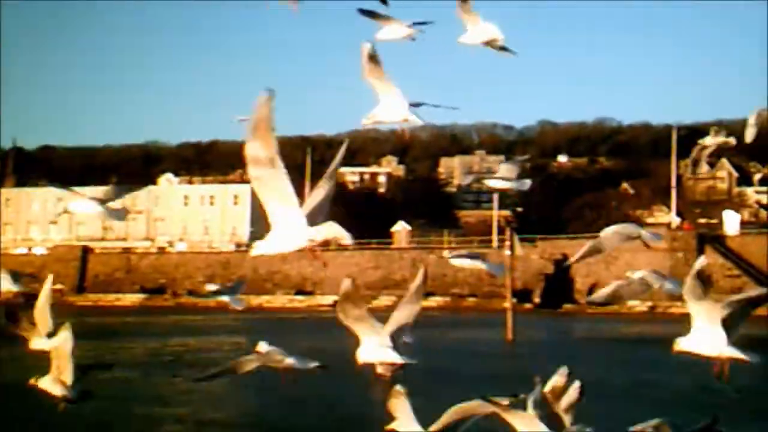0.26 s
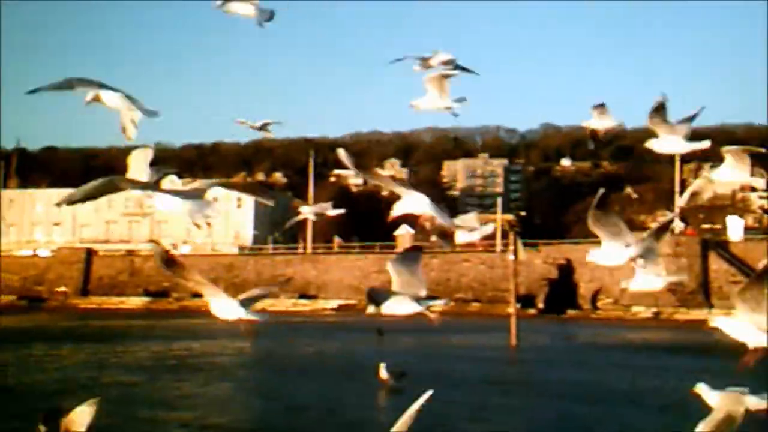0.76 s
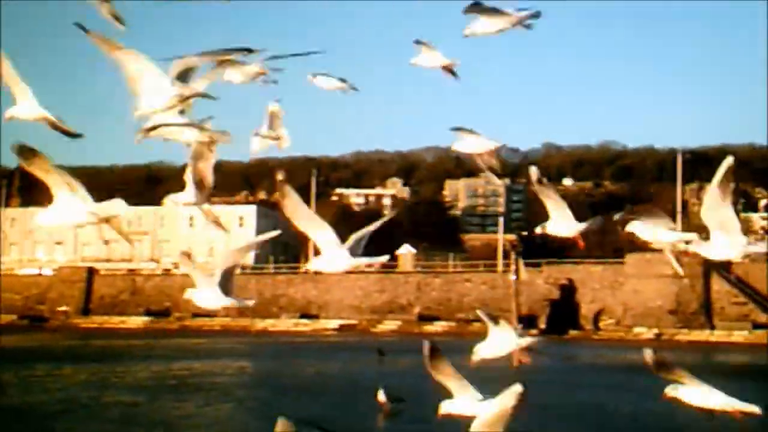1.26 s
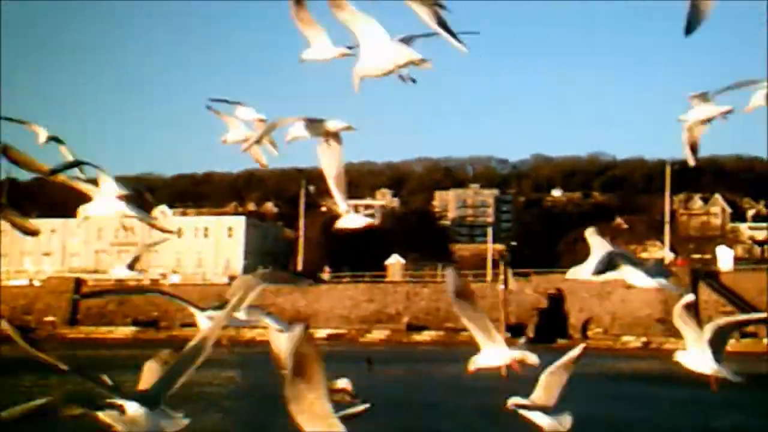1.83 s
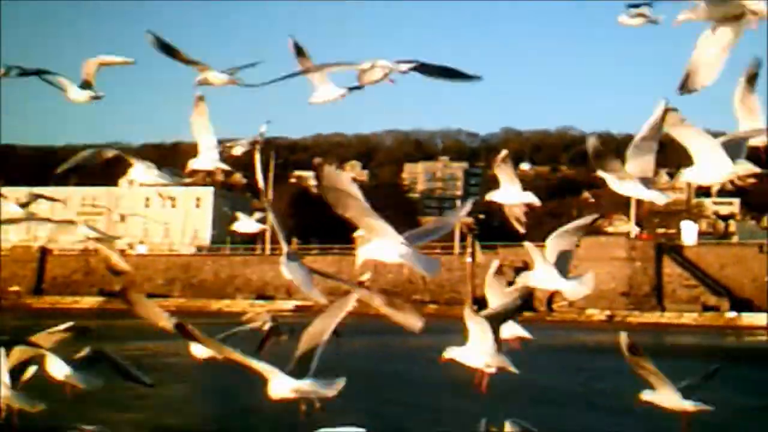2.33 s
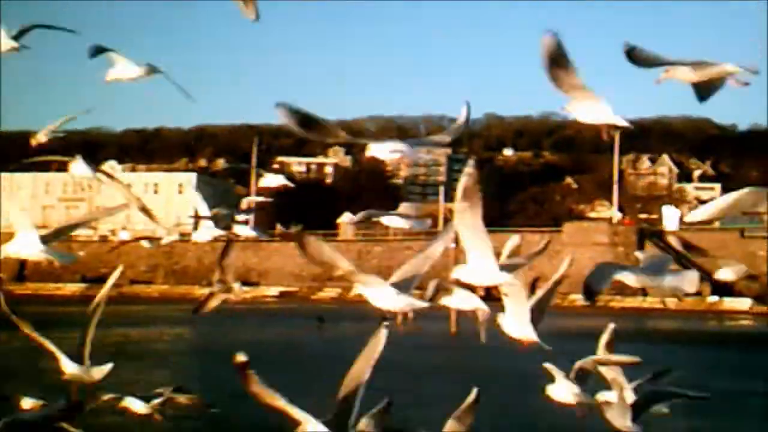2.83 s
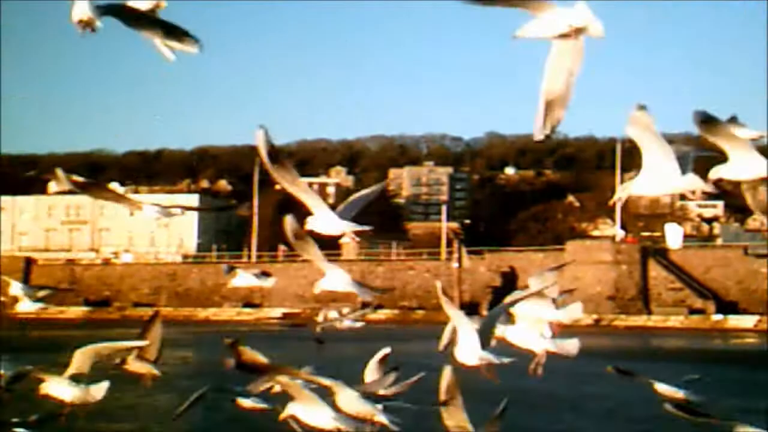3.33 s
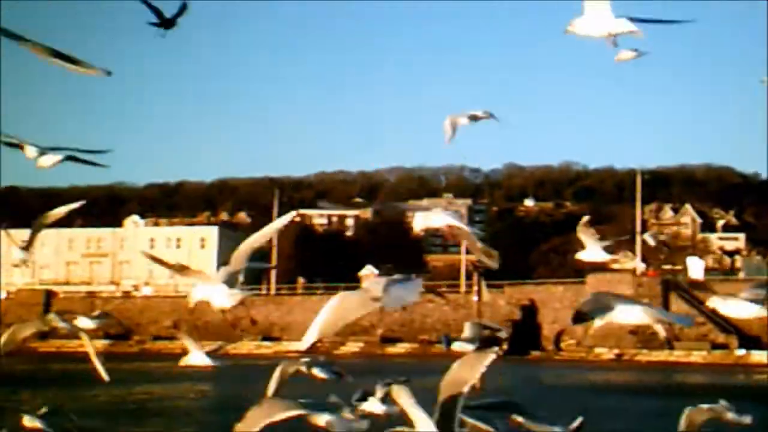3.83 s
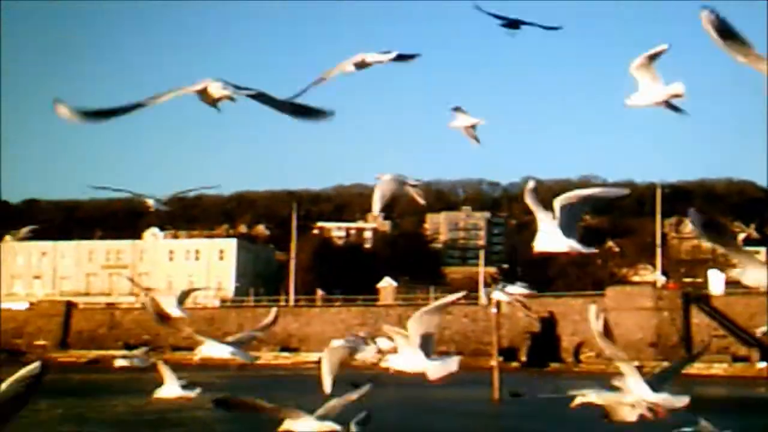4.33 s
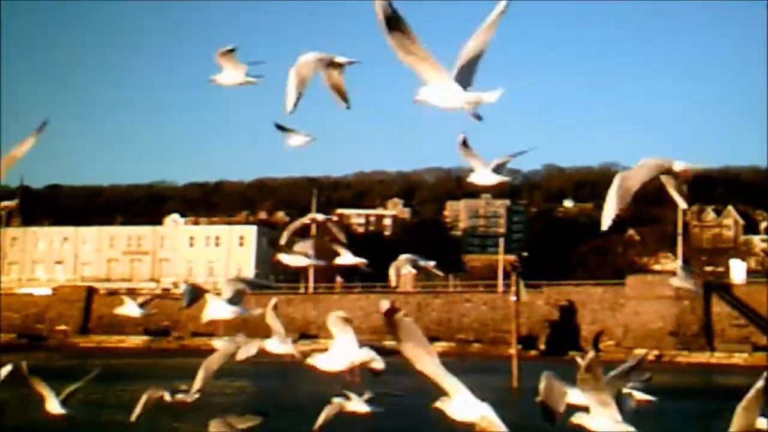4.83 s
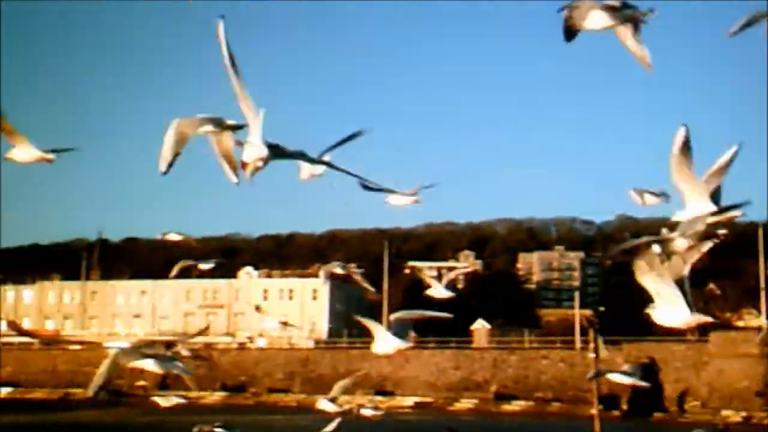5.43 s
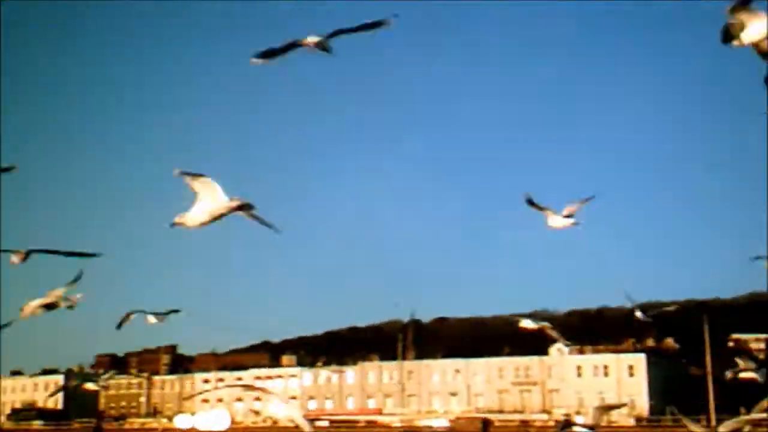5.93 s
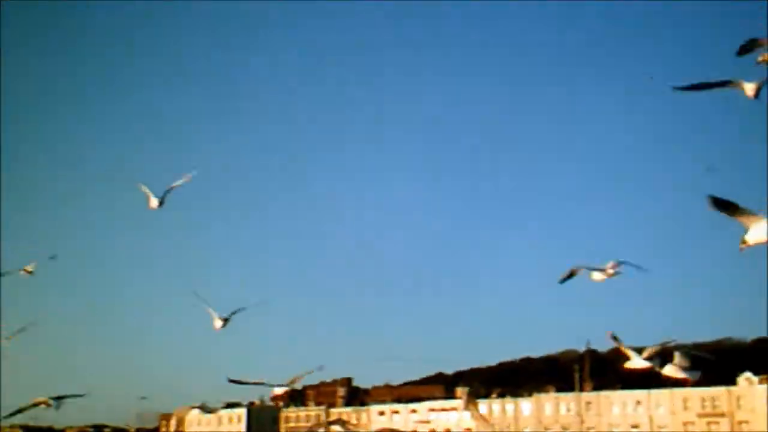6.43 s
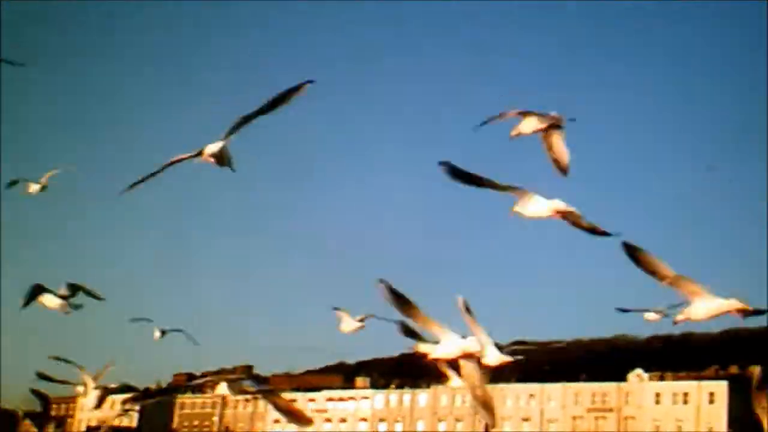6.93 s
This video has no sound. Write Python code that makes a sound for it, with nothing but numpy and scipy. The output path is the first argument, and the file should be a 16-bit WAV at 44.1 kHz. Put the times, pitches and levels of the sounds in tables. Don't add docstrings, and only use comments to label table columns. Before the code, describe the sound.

On an open, windy shore, a flock of gulls calls close to a small microphone. From 0 to 1.4 seconds, short hoarse squawks, rasping barks and clear yelps tumble over one another, with distant birds blurred behind and low wind lumps beneath. Between 1.4 and 2.6 seconds the calls are raspier and more spaced; a high falling cry comes at 2.8, then a dense cluster of squawks until 3.8 as a gust rushes in. Around 4.4 a higher cry leads into a wavering, sinking one to 4.9, with thin whistles. From 5.1 to 5.9 loud clear squawks return with the strongest gust, its rumble dropping away suddenly near 5.9. Quieter calls follow; at 6.6 a slowly sinking cry and a high squeak, then rasps and a high cry falling late, to 7.2. Short dull echoes, sparse ticks, faint hiss and whine remain.

```python
import sys
import numpy as np
from scipy import signal
from scipy.io import wavfile
from scipy.ndimage import uniform_filter1d

SR = 44100
rng = np.random.default_rng(int(sys.argv[2]) if len(sys.argv) > 2 else 0)


def put_to_file(sound):
    columns = np.atleast_2d(sound).T
    safe = np.clip(columns, -1, 1)
    whole_steps = np.round(safe * 32767)
    wavfile.write(sys.argv[1], SR, whole_steps.astype(np.int16))


def convert_level_to_amplitude(level_db):
    exponent = np.asarray(level_db, float) / 20
    return 10 ** exponent


N = 316197

# (frequency [Hz], level [dB])
THROAT = [(600, -22), (1100, -9.5), (1700, 8.5), (2150, -2), (2700, 3.5), (3250, 3.5), (4000, -6),
          (5500, -13), (7300, -16.5), (9000, -25), (11000, -25)]
# (time [s], length [s], level [dB], pitch [Hz])
CLEAR = [(0.52, 0.063, -40, 1208), (0.671, 0.053, -47, 955), (1.693, 0.063, -48.5, 940),
         (2.763, 0.025, -56, 980), (3.215, 0.043, -46.5, 1050), (3.363, 0.033, -41, 1148),
         (3.528, 0.075, -43.5, 1200), (5.105, 0.04, -34, 1168), (5.377, 0.0307, -34, 1116),
         (5.555, 0.043, -39, 1090), (5.866, 0.032, -56, 1160), (5.888, 0.046, -54, 1132),
         (5.949, 0.046, -60.5, 802)]
# (time [s], length [s], level [dB], pitch [Hz])
HOARSE = [(0, 0.04, -42.5, 1024), (0.095, 0.05, -44.5, 909), (0.132, 0.098, -42, 1127),
          (0.314, 0.053, -52.5, 1082), (0.382, 0.068, -42.5, 930), (0.944, 0.039, -47, 1100),
          (0.998, 0.0473, -38, 1010), (1.072, 0.035, -47, 940), (1.46, 0.037, -46.5, 1333),
          (1.538, 0.051, -62, 1350), (1.991, 0.087, -48.5, 1106), (2.116, 0.077, -47, 1012),
          (2.678, 0.071, -43.5, 1009), (2.89, 0.065, -39, 1088), (3.013, 0.062, -46, 962),
          (3.07, 0.074, -46, 1021), (3.5, 0.043, -47, 1140), (3.605, 0.051, -45, 1046),
          (5.295, 0.059, -42, 980), (5.632, 0.063, -43.5, 1032), (3.775, 0.076, -50.5, 1060),
          (4.12, 0.061, -51, 1047), (6.032, 0.095, -55.5, 901), (6.067, 0.055, -54.5, 1195),
          (6.189, 0.035, -65, 910), (5.693, 0.066, -42, 1028), (6.784, 0.047, -52, 998),
          (.755, 0.077, -52, 1040), (5.77, .05, -65, 770), (4.4, .06, -59, 1000), (4.51, .05, -56, 900)]
# (time [s], length [s], level [dB], pitch [Hz])
RASPING = [(0.457, 0.065, -42.5, 1045), (0.584, 0.06, -43.5, 1038), (1.385, 0.084, -42, 1220),
           (1.637, 0.059, -47.5, 1355), (1.826, 0.061, -50, 1315), (1.916, 0.084, -51, 1054),
           (2.276, 0.11, -45.5, 1000), (2.478, 0.086, -47, 1064), (2.598, 0.05, -52, 872),
           (3.272, 0.052, -40, 1089), (3.684, 0.066, -47, 902), (3.964, 0.051, -48.5, 1258),
           (5.51, 0.06, -41.5, 1065), (6.865, 0.14, -49, 949), (6.965, 0.11, -50, 1116),
           (7.072, 0.082, -57, 1028)]
# (time [s], length [s], level [dB], pitch [Hz], brightness [dB])
TURNED = [(0.772, 0.051, -64, 1040, 18), (1.164, 0.029, -66, 1240, 3), (1.22, 0.044, -41, 807, 4),
          (1.346, 0.044, -40.5, 890, -1), (1.569, 0.046, -56, 1340, 11), (3.417, 0.062, -47.5, 1008, 2),
          (3.768, 0.086, -50.5, 1202, 9), (4.104, 0.07, -51, 1213, 8), (4.317, 0.048, -52, 970, 5),
          (4.857, 0.016, -50, 973, -27), (5.837, 0.019, -53, 1344, -6), (6.015, 0.045, -57.5, 1170, -13),
          (6.232, 0.063, -60, 1043, 1), (6.322, 0.041, -51, 957, -12), (6.363, 0.035, -51.5, 945, -8),
          (6.775, 0.049, -46.5, 887, -28)]
# (time [s], length [s], level [dB], first pitch [Hz], last pitch [Hz])
NOTES = [(.138, 0.03, -35, 1100, 1152), (.172, 0.04, -43.5, 1098, 1065), (.83, 0.044, -34.5, 976, 1094),
         (.864, 0.031, -38, 1033, 1040), (1.045, 0.032, -36, 984, 950), (3.072, 0.0355, -46, 990, 862),
         (4.628, 0.017, -56, 860, 870), (4.895, 0.033, -45, 1080, 1053), (4.93, 0.041, -43.5, 1050, 1085),
         (5.525, 0.026, -55, 1030, 1050), (6.085, 0.021, -68, 1220, 1140), (1.122, 0.022, -45, 920, 900),
         (1.712, 0.041, -45.5, 930, 978), (2.015, 0.058, -49, 1070, 1107), (2.115, 0.046, -44, 1018, 1034),
         (5.575, 0.026, -46, 1074, 1090), (5.645, 0.045, -48, 1041, 1047)]
# (time [s], length [s], level [dB], first pitch [Hz], last pitch [Hz])
BRIGHT_NOTES = [
    (1.188, 0.017, -50, 900, 970),
    (1.298, 0.029, -48, 900, 890),
    (1.357, 0.023, -48, 880, 925),
    (5.515, 0.037, -52, 720, 660),
]
# (time [s], length [s], level [dB], first pitch [Hz], last pitch [Hz])
SLIDES = [(.11, .07, -44, 688, 678), (.262, .05, -52, 665, 725), (.29, .06, -45, 1165, 1150),
          (.9, .047, -52, 1130, 1235), (2.39, .097, -46, 866, 850), (2.8, .065, -36, 1480, 1225),
          (4.41, .124, -42, 2040, 1990), (5.172, .058, -45, 1920, 1600), (.06, .028, -51, 2250, 2360),
          (.17, .02, -42, 1790, 1650), (1.89, .04, -48, 1560, 1520), (1.925, .022, -46, 2850, 2750),
          (5.575, .08, -48, 1040, 1050), (5.815, .04, -49, 375, 315), (6.02, .05, -56, 2330, 2400),
          (6.04, .025, -53, 2780, 2800), (6.617, .04, -39, 3480, 3430), (7.062, .028, -44, 3220, 3230),
          (6.498, .02, -45, 752, 752)]
# (time [s], length [s], level [dB], end pitch [Hz], top pitch [Hz])
ARCHES = [
    (5.645, .19, -46, 1035, 1270),
    (6.47, .12, -52, 1005, 1130),
    (6.18, .15, -49, 840, 950),
    (6.555, .065, -48, 860, 900),
]
# (time [s], length [s], level [dB], first pitch [Hz], last pitch [Hz])
CROAKS = [
    (4.777, 0.117, -42.5, 676, 660),
    (6.841, 0.065, -45, 548, 560),
]
# (time [s], pitch [Hz], level [dB])
LONG_CRIES = [
    [(4.546, 732, -46), (4.59, 698, -40), (4.62, 716, -38), (4.64, 698, -43), (4.678, 730, -39),
     (4.69, 700, -40), (4.73, 684, -41), (4.775, 668, -44)],
    [(6.592, 722, -52), (6.625, 695, -48), (6.66, 678, -38), (6.7, 668, -39), (6.79, 658, -40),
     (6.805, 652, -51), (6.845, 645, -52)],
    [(6.89, 1040, -50), (6.92, 1070, -40), (6.99, 1090, -41), (7.065, 1115, -43), (7.078, 995, -40),
     (7.165, 950, -46)],
]
CRY_HARMONICS_DB = [
    [-27, -6, -2.5, 0, -12, -27],
    [-25, -20, -9, 1, 0, -13],
    [0, -23.5],
    [-20, -16, -19, 2, 0],
    [-25, -20, -7, 2, -21],
    [1, -6, -13, -21],
    [0, -9],
    [-15, 0, -19],
    [-3, 0, -6],
    [0, -15],
    [0, -10],
    [0, -20],
    [0, -22],
    [-40, -40, -40, -40, -40, -4, 0, -6],
    [0, -25],
    [0, -25],
    [0, -24],
    [0, -30],
    [-30, -30, -5, 0, -12, -22, -13, -19],
    [0, -9, -22],
    [0, -22, -28],
    [-17, 0, -14],
    [-17, 0, -7],
    [-25, -12, 0, -2, -9, -12],
    [-25, -20, -2, -5, -6, -4, 0, -6, -12],
    [-33, 1, -5, 4, -7, -2, -12, -20, -26, -24],
    [-32, -29, -13, 0, 1, -6, -18, -6, -18, -34],
    [-17, 0, -11, -21, -27, -20],
]
CRY_THROBS = 21 * [(.2, 45, .1, .003)] + [(.9, 22, .4, .02), (.5, 60, .3, .01), (.85, 45, .5, .02),
              (.6, 60, .45, .02), (.85, 22, .26, .012), (.75, 23.5, .11, .002), (.6, 88, .58, .012)]
# (time [s], length [s], level [dB], first pitch [Hz], last pitch [Hz])
WHISTLES = [(1.025, .175, -61, 6150, 5020), (2.32, .11, -59, 5650, 5380), (2.5, .04, -62, 5400, 5440),
            (3.33, .085, -68, 6550, 5750), (4.73, .175, -67, 6750, 5600), (4.875, .22, -62, 5620, 5370),
            (6.53, .045, -50, 2980, 2945), (5.085, .025, -64, 5380, 4600), (6.49, .02, -69, 7000, 8500),
            (3.415, .04, -68, 5700, 6080), (3.455, .06, -69, 6050, 5150), (3.515, .04, -67, 5080, 5400)]
# (frequency ratio [1], relative level [dB])
UNDERTONES = [(.5, 9), (0.45, -9), (.5, -15), (0.52, -6), (.857, -6), (.857, 0), (0.45, -10), (.857, -12),
              (.5, -20), (.5, -9), (.5, 3), (.49, 10)]
# (time [s], level [dB])
FAR = [(0.0, -27.5), (0.14, -46.5), (0.94, -29.5), (1.1, -25), (1.46, -39), (2.31, -39), (2.91, -34),
       (3.13, -55), (3.45, -30), (3.7, -44.5), (4.15, -38), (4.37, -91), (4.55, -41.5), (5.4, -36),
       (5.85, -45), (6.3, -93), (6.59, -45.5), (6.95, -43)]
# (frequency [Hz], density [dB per Hz])
BUFFET = [(1.8, -47), (3.0, 2.5), (23, 4.5), (35, -7.5), (65, -12.5), (300, -35), (390, -42), (660, -120)]
# (frequency [Hz], density [dB per Hz])
RUSH = [(50, -37), (110, 3), (250, -6.5), (450, -12), (900, -49.5)]
# (frequency [Hz], density [dB per Hz])
ROAR = [(200, -3), (420, 1), (800, -2), (1500, -7), (3000, -22), (6000, -38.5), (11000, -52)]
# (time [s], level [dB])
WIND = [(0.0, -29), (0.5, -18), (1.18, -25), (1.36, -15), (1.44, -22.5), (2.97, -19.5), (3.07, -26),
        (3.61, -19.5), (3.97, -19), (4.03, -28.5), (4.25, -20), (4.37, -34.5), (4.71, -22.5), (5.85, -18.5),
        (5.89, -29.5), (6.19, -35), (6.71, -22), (7.17, -28.5)]
# (time [s], length [s], level [dB], change to end [dB], roar share [dB])
GUSTS = [(0.12, 0.3, -55, -15, 4.5), (0.208, 0.63, -33.5, -12.5, -10.5), (0.79, 0.097, -38.5, 16, -12.5),
         (0.962, 0.44, -34.5, 6, -5), (1.498, 0.68, -38, -9, -3), (2.183, 0.78, -42.5, -1, -6.5),
         (2.922, 0.16, -46.5, 2, -1.5), (3.191, 0.83, -33, -12.5, -9), (3.808, 0.18, -39, 6, -11.5),
         (4.121, 0.042, -38, 7.5, -18.5), (4.267, 0.45, -43, 9.5, -12), (4.881, 0.26, -37, 5, -3.5),
         (5.224, 0.078, -38, 10, -3), (5.328, 0.13, -28.5, 5.5, -4.5), (5.497, 0.16, -23, -18, -15.5),
         (5.659, 0.17, -46.5, 14.5, -13.5), (5.912, 0.21, -45, 0, -17.5), (6.328, 0.34, -36, -10, -15.5),
         (6.632, 0.24, -35, -10.5, -14), (7.002, 0.17, -44.5, 12.5, -13.5)]
# (time [s], peak level [dB])
TICKS = [
    (1.385, -34),
    (1.698, -37),
    (2.254, -41),
    (5.8558, -45),
    (6.4944, -61),
    (6.842, -55),
    (3.689, -47),
]
# (frequency [Hz], density [dB per Hz])
HISS = [(500, -32), (1500, 18), (4000, -4), (7000, 3), (10000, 5.5), (12000, -44)]
# (frequency [Hz], rms level [dB])
WHINE = [
    (6700, -80),
    (9600, -88),
]

EDGE_HZ = 10950


def near_flock():
    calls = []
    for rows, rough, bright_db in ((CLEAR, .31, 0), (HOARSE, .63, -1.2), (RASPING, .8, -1)):
        calls += [(*row, rough, bright_db) for row in rows]
    turned_rough = .56
    calls += [(*row, turned_rough, bright_db) for *row, bright_db in TURNED]
    out = np.zeros(N)
    for time_s, *call in calls:
        a, b, c = rng.random(3)
        add(out, time_s, squawk(*call, throb_hz=68 + 18 * a, bend=.05 + .07 * b, slur=.07 * (c - .5)))
    return out


def squawk(length_s, db, hz, rough, bright_db, throb_hz, bend, slur, count=20):
    t = np.arange(0, length_s, 1 / SR)
    u = 2 * t / length_s - 1
    burst = (t * throb_hz + 0.1 * wander(len(t), 40)) % 1

    call_bend = slur * u - bend * (u ** 2 - .2)
    burst_bend = -.06 * (2 * burst - 1) ** 2
    jitter = (.008 + .016 * rough) * wander(len(t), 90)
    pitch = 1.025 + call_bend + burst_bend + jitter

    half_db = -26 + 26 * rough

    def colour_db(k, f):
        facing_db = bright_db * np.clip(np.log2(f / 3300) * 1.5, -.5, 1)
        return read(THROAT, f) + facing_db + half_db * (k % 2)

    tone = stack(hz / 2 * pitch, colour_db, .06 + .66 * rough, count)
    opening = .08 + .22 * rough + 1.05 * np.sin(np.pi * burst) ** 1.1
    gate = opening * convert_level_to_amplitude(1.5 * wander(len(t), 70))
    swell = (1 + u) ** 1.05 * (1 - u) ** .48
    return convert_level_to_amplitude(db + 3.5) * tone * gate * swell


def notes():
    out = np.zeros(N)
    for rows, bright_db in ((NOTES, -5), (BRIGHT_NOTES, 13)):
        for time_s, length_s, db, first_hz, last_hz in rows:
            mean_hz = (first_hz + last_hz) / 2
            slur = (last_hz - first_hz) / (last_hz + first_hz)
            note = squawk(length_s, db, .98 * mean_hz, .2, bright_db, throb_hz=56.0, bend=.03, slur=slur)
            add(out, time_s, note)
    return out


def cries():
    effort_tilt = 0.16
    uneven_db = 2.5
    out = np.zeros(N)
    curves = [slide(*row, ends_db=-4) for row in SLIDES]
    curves += [arch(*row, ends_db=-8) for row in ARCHES]
    curves += [slide(*row, ends_db=-4) for row in CROAKS] + LONG_CRIES
    for rows, parts_db, (depth, rate_hz, hoarse, sag) in zip(curves, CRY_HARMONICS_DB, CRY_THROBS):
        t, hz, db = columns(rows)
        beat = rate_hz * (t - t[0]) + 0.09 * wander(len(t), 13.7)
        throb_sag = sag * (.5 - beat % 1)
        waver = (.005 + .018 * hoarse) * wander(len(t), 60)

        def colour_db(k, f):
            above_strongest = max(k - np.argmax(parts_db), 0)
            fading_db = effort_tilt * above_strongest * (db - db.max())
            return parts_db[k - 1] + fading_db + uneven_db * wander(len(t), 12)

        tone = stack(hz * (1 + throb_sag + waver), colour_db, hoarse, len(parts_db))
        pulse = 1 - depth * np.cos(np.pi * beat) ** 6
        fade = signal.windows.tukey(len(t), min(.024 * SR / len(t), .5))
        add(out, t[0], convert_level_to_amplitude(db) * tone * pulse * fade)
    return out


def slide(time_s, length_s, db, first_hz, last_hz, ends_db, midway=.25):
    middle_hz = first_hz + midway * (last_hz - first_hz)
    return [(time_s, first_hz, db + ends_db),
            (time_s + length_s / 2, middle_hz, db),
            (time_s + length_s, last_hz, db + ends_db)]


def arch(time_s, length_s, db, end_hz, top_hz, ends_db):
    return [(time_s, end_hz, db + ends_db),
            (time_s + length_s / 2, top_hz, db),
            (time_s + length_s, end_hz, db + ends_db)]


def whistles():
    out = np.zeros(N)
    for row, (ratio, under_db) in zip(WHISTLES, UNDERTONES):
        t, hz, db = columns(slide(*row, ends_db=-1.5, midway=0.7))
        phase = 2 * np.pi * np.cumsum(hz * (1 + .006 * wander(len(t), 70))) / SR
        tone = np.cos(phase) + convert_level_to_amplitude(under_db) * np.cos(ratio * phase)
        level = convert_level_to_amplitude(db + 2 + 2.5 * wander(len(t), 39))
        add(out, t[0], level * tone * signal.windows.tukey(len(t), .2))
    return out


def stack(hz, colour_db, hoarse, count):
    turns, out = np.cumsum(hz) / SR, 0
    for k in range(1, count + 1):
        flutter_hz = 160 + 25 * k
        steady = convert_level_to_amplitude(2.2 * wander(len(hz), 30))
        breathy = wander(len(hz), flutter_hz) + 1j * wander(len(hz), flutter_hz)
        flutter = (1 - hoarse) * steady + hoarse * breathy
        line = (flutter * np.exp(2j * np.pi * (k * turns + rng.random()))).real
        out = out + convert_level_to_amplitude(colour_db(k, k * hz)) * (k * hz < EDGE_HZ) * line
    return evened(out)


def scattered(x):
    t60_s, level_db = .1, -16
    t = np.arange(round(t60_s * SR)) / SR
    sparse = rng.random(len(t)) < .05
    taps = rng.standard_normal(len(t)) * sparse * convert_level_to_amplitude(-60 * t / t60_s)
    taps = signal.lfilter([1], [1, -.5], taps)
    return convert_level_to_amplitude(level_db) * signal.oaconvolve(x, taps / np.linalg.norm(taps))[:N]


def far_flock():
    out = np.zeros(N)
    for at, a, b, c in rng.random((110, 4)):
        call = squawk(0.0421 + 0.086 * a, 4 * c, 800 + 550 * b, 0.62, -5.5,
                      throb_hz=85.3, bend=0.05, slur=0.06 * (a - c), count=12)
        add(out, at * N / SR, call)
    out += .55 * evened(noise(THROAT, 3.0, 1.0, size=512)) * np.std(out)
    presence_db = np.interp(np.arange(N) / SR, *np.transpose(FAR))
    return evened(out) * convert_level_to_amplitude(presence_db - 11.0)


def wind():
    t = np.arange(N) / SR
    rushing, roaring = gusts()
    eddies = wander(N, 35)
    lumps = noise(BUFFET, 0.19, 2.17, size=8192) * convert_level_to_amplitude(np.interp(t, *np.transpose(WIND)) + 2.3 * eddies)
    rush = noise(RUSH, 2.86, 2.1, size=1024) * rushing * convert_level_to_amplitude(1.75 * eddies - 3.5)
    roar = noise(ROAR, 0.97, 0.8, size=512) * roaring * convert_level_to_amplitude(2.79 * eddies + 3.5)
    return lumps + rush + roar


def gusts():
    rise_s, fall_s, calm_rush_db, calm_roar_db = 0.087, 0.13, -68, -63.5
    t = np.arange(N) / SR
    rush_power, roar_power = convert_level_to_amplitude(calm_rush_db) ** 2, convert_level_to_amplitude(calm_roar_db) ** 2
    for time_s, length_s, db, change_db, roar_db in GUSTS:
        onset = (t - time_s) / rise_s + .5
        release = (time_s + length_s - t) / fall_s + .5
        edges = np.clip(np.minimum(onset, release), 0, 1)
        power = edges * convert_level_to_amplitude(db + change_db * np.clip((t - time_s) / length_s, 0, 1)) ** 2
        rush_power = rush_power + power
        roar_power = roar_power + power * convert_level_to_amplitude(roar_db) ** 2
    return np.sqrt(rush_power), np.sqrt(roar_power)


def ticks():
    out, t = np.zeros(N), np.arange(300) / SR
    for time_s, db in TICKS:
        snap = signal.lfilter([1], [1, -.8], rng.standard_normal(len(t)))
        add(out, time_s, convert_level_to_amplitude(db) * snap * np.exp(-t / 0.00091))
    return out


def electronics():
    t = np.arange(N) / SR
    hiss = convert_level_to_amplitude(-67.5) * noise(HISS, .6, .4, size=1024)
    return hiss + sum(convert_level_to_amplitude(db + 1.0) * np.sin(2 * np.pi * hz * t) for hz, db in WHINE)


def noise(shape, patchy_db, flicker_db, size):
    frames, hz = 4 * N // size + 5, np.fft.rfftfreq(size, 1 / SR)
    a, b, patches = rng.standard_normal((frames, len(hz), 3)).T
    patches = evened(uniform_filter1d(uniform_filter1d(patches, 6, 0), 6, 1))
    flicker = evened(uniform_filter1d(rng.standard_normal(frames), 3))
    level_db = read(shape, hz)[:, None] + patchy_db * patches + flicker_db * flicker
    z = (a + 1j * b) * convert_level_to_amplitude(level_db)
    return evened(signal.istft(z, nperseg=size, noverlap=3 * size // 4)[1][:N])


def wander(count, hz):
    at = np.arange(count) * 1.5 * hz / SR
    knots = rng.standard_normal(int(at[-1]) + 2)
    return np.sqrt(1.5) * np.interp(at, np.arange(len(knots)), knots)


def evened(x):
    return x / np.sqrt(np.mean(x ** 2) + 1e-20)


def read(points, hz):
    f, value_db = np.transpose(points)
    return np.interp(np.log(hz + 1), np.log(f + 1), value_db)


def columns(rows):
    s, *rest = np.transpose(rows)
    t = np.arange(s[0], s[-1], 1 / SR)
    return [t] + [np.interp(t, s, c) for c in rest]


def add(mix, time_s, sound):
    part = mix[round(time_s * SR):][:len(sound)]
    part += sound[:len(part)]


def scene():
    gulls = near_flock() + notes() + cries() + whistles()
    sand_echo = 0.091 * np.concatenate([np.zeros(260), gulls])[:N]
    air = far_flock() + wind() + ticks()
    return (gulls + sand_echo + scattered(gulls) + air)[None]


def band_limit(x):
    return signal.sosfilt(signal.butter(12, 11260, fs=SR, output="sos"), x)


def record(dry):
    x = dry + electronics()
    x = .42 * np.tanh(x / .42)
    low_pass = signal.firwin(151, EDGE_HZ, window=("kaiser", 5), fs=SR)
    mix = signal.oaconvolve(x, low_pass[None], "same")
    return band_limit(mix)


dry = scene()
out = record(dry)
put_to_file(out)
```